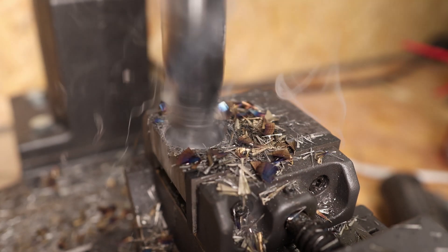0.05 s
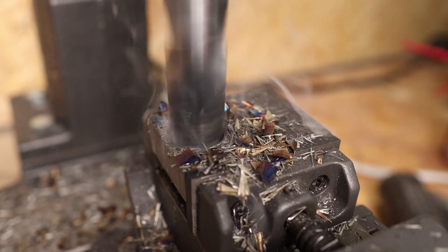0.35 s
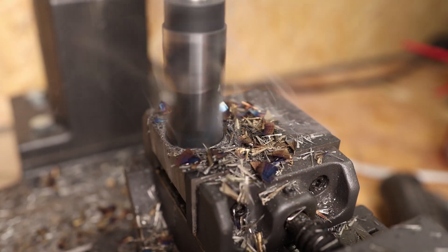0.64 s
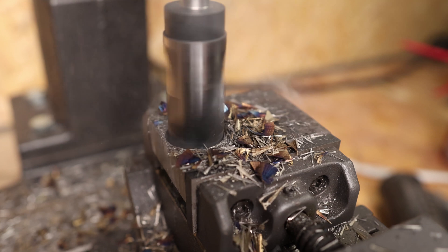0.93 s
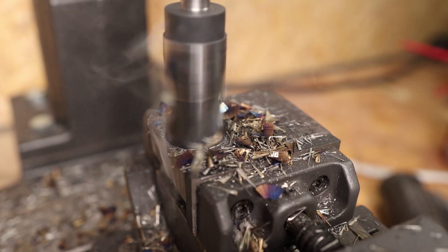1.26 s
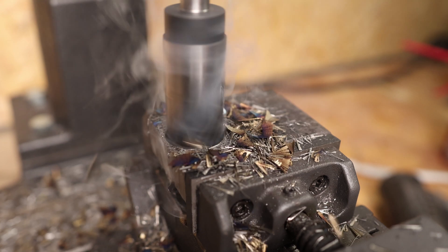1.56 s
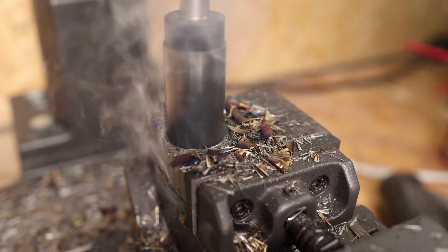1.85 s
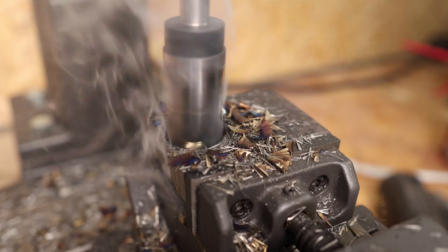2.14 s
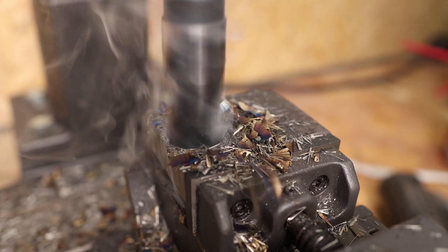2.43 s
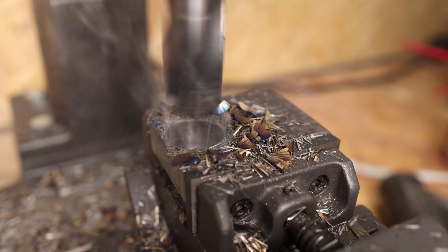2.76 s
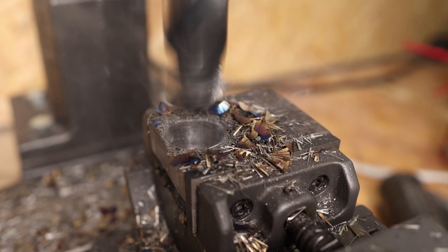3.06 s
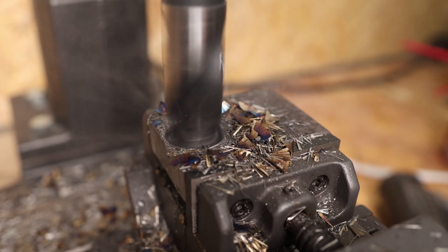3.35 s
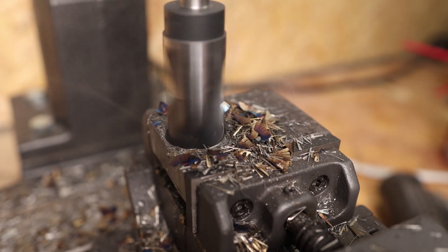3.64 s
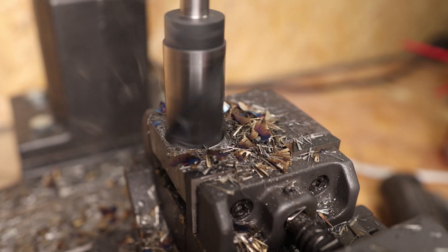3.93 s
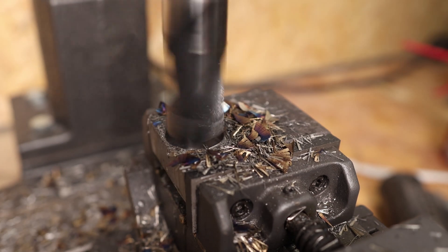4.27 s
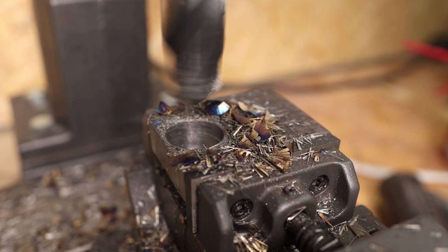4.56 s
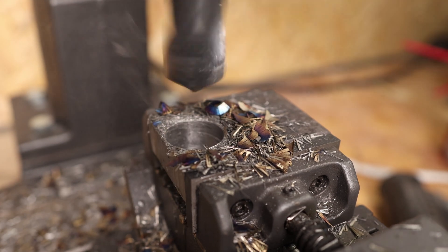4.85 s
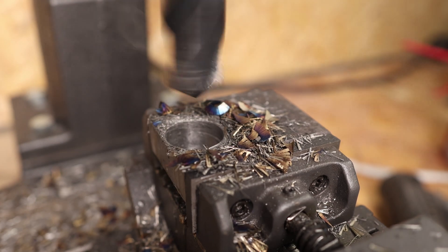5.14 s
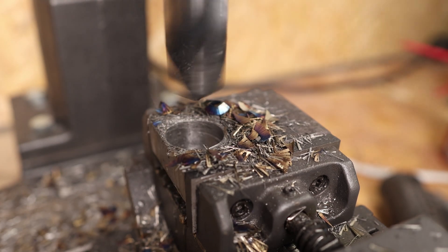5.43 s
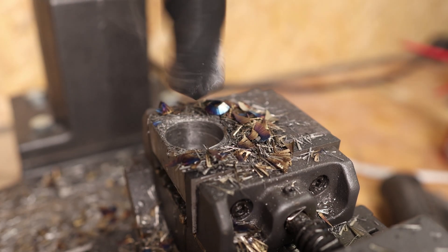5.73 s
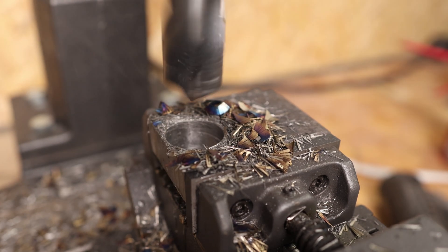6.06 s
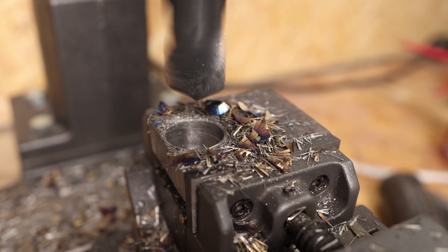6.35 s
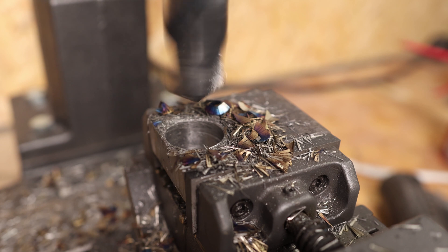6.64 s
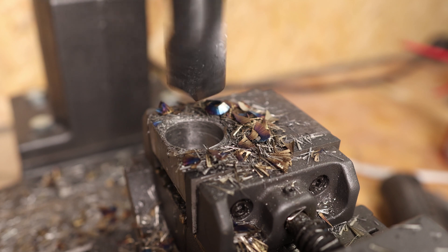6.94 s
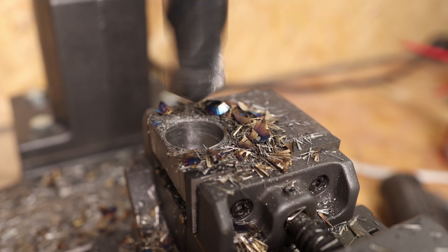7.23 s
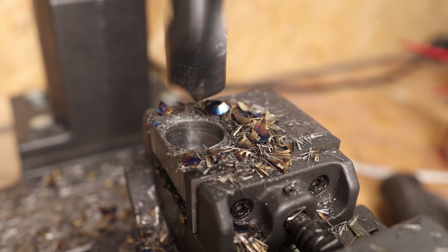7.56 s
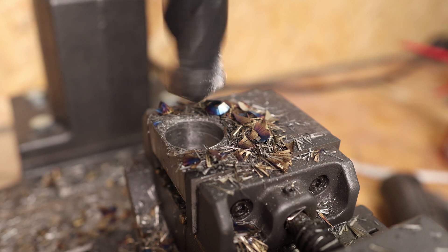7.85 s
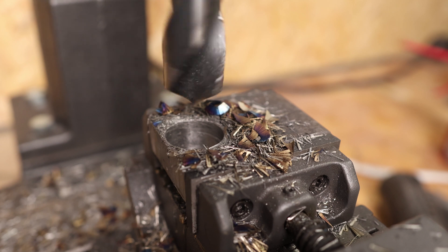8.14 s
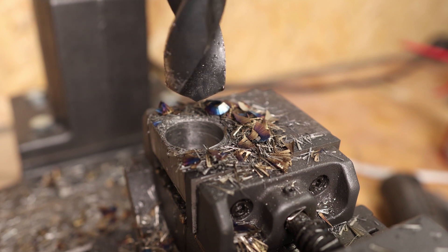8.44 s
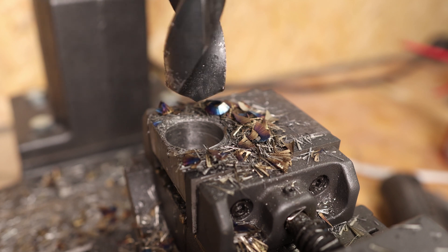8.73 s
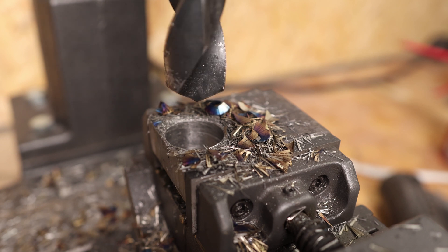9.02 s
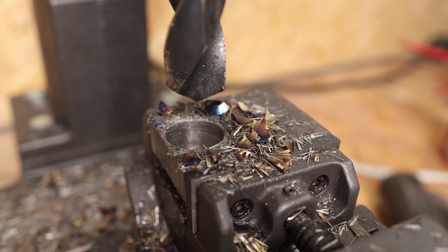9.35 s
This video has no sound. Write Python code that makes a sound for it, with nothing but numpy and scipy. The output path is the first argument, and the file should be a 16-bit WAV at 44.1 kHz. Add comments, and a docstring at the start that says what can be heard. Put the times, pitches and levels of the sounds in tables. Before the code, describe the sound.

Close up in a workshop, a belt-driven drill press hums, rattles and taps while its bit is pushed into steel three times. The second push is much the loudest, a slightly distorted grinding with groans, short squeals and tinkling metal chips. The drill then spins freely for a few seconds before it is clicked off and coasts to rest with several belt knocks, leaving a faint ring and a soft rustle.

```python
"""A belt-driven bench drill press runs: the motor hums, the pulleys rattle, a loose bearing taps.
A large bit is pushed into steel three times; it scrapes, squeals and snaps off chips that tinkle
on the vice. The second, hardest cut makes bit and table groan and overloads the close microphone.
After the third the bit is lifted with a faint hiss. The switch clicks, the belt knocks as the
motor coasts to a stop, the frame rings on, and something rustles softly, like a sleeve."""
import sys
import numpy as np
from scipy import signal
from scipy.fft import rfft, irfft, next_fast_len
from scipy.io import wavfile
from scipy.ndimage import map_coordinates

SR = 44100
rng = np.random.default_rng(int(sys.argv[2]) if len(sys.argv) > 2 else 0)


def wav_out(sig):
    """Save sig, one row per channel (or a flat mono array), as 16-bit PCM at SR to the path in sys.argv[1]."""
    wavfile.write(sys.argv[1], SR, np.round(np.clip(np.atleast_2d(sig).T, -1, 1) * 32767).astype(np.int16))


N = 422919
TIME = np.arange(N) / SR

FREE_HZ, SAG_HZ = 24.75, .55  # motor turns a second when free, and the drop under full load
OFF_S, COAST_S = 7.714, .82  # the power is cut; time to coast to rest

# broad tone of the rattling casting: f/Hz, level/dB
RATTLE = [(100, -29.5), (280, -2), (450, -4), (700, .5), (1100, 0.5), (1500, -0.4), (2300, -7),
          (2800, -16.5), (3500, -19.5), (4700, -17), (5400, -23), (7500, -29.5), (10000, -32.5),
          (12000, -39), (16000, -42)]
# resonances of the casting: f/Hz, width/Hz, boost/dB
CASTING_MODES = [(311.5, 43, 12), (360, 50, 7.8), (554.3, 57, 11.4), (855, 26, 3.6), (1417, 50, 5.6),
                 (1770, 57, 2.5), (2130, 61, 7.6), (2425, 56, 6.5), (4130, 330, 5), (4550, 40, 3.5),
                 (4760, 41, 5.3), (4870, 63, 6)]


def amp(db):
    """Decibels to gain."""
    return 10 ** (np.asarray(db) / 20)


def unit(x):
    """Scaled to rms 1."""
    return x / np.sqrt(np.mean(x ** 2) + 1e-20)


def along(points, hz):
    """(f/Hz, value) points read on a log frequency axis."""
    f, values = np.transpose(points)
    return np.interp(np.log(hz + 1), np.log(f + 1), values)


def curve(points, at=TIME):
    """(t/s, value) points joined by straight lines."""
    return np.interp(at, *np.transpose(points))


def wobble(rate):
    """A smooth random curve, rate knots a second."""
    knots = rng.standard_normal(int(N * rate / SR) + 4)
    return np.interp(TIME, TIME[::16], map_coordinates(knots, [TIME[::16] * rate]))


def noise():
    """Fresh white noise."""
    return rng.standard_normal(N)


def body(x, spectrum, modes=(), size=8192):
    """Colours x with a broad tone (f/Hz, level/dB) and resonances (f/Hz, width/Hz, boost/dB)."""
    hz = np.fft.rfftfreq(size, 1 / SR)
    peaks_db = sum(boost / (1 + (2 * (hz - f) / width) ** 2) for f, width, boost in modes)
    cepstrum = irfft(np.log(amp(along(spectrum, hz) + peaks_db)))
    cepstrum[1:size // 2] *= 2  # minimum phase: nothing rings ahead of a hit
    cepstrum[size // 2 + 1:] = 0
    return signal.oaconvolve(x, irfft(np.exp(rfft(cepstrum))))[:N]


def bursts(rows, attack, t60):
    """The envelope of blows (t/s, level/dB) that rise quickly and die away."""
    out, t = np.zeros(N + SR), np.arange(SR) / SR
    shape = (1 - np.exp(-t / attack)) * amp(-60 * t / t60)
    for s, db in rows:
        out[max(0, round(s * SR)):][:SR] += (amp(db) * shape) ** 2
    return np.sqrt(out[:N])


def swells(rows):
    """The envelope of smooth swells (t/s, level/dB, width/s)."""
    slow = TIME[::32]
    level = sum(amp(db) * np.exp(-((slow - s) / width) ** 2) for s, db, width in rows)
    return np.interp(TIME, slow, level)


def lagging(x, t60):
    """A control that follows x with inertia."""
    keep = amp(-60 / (t60 * SR))
    return signal.lfilter([1 - keep], [1, -keep], x - x[0]) + x[0]


def coasting():
    """Seconds since the power was cut."""
    return np.maximum(TIME - OFF_S, 0)


def motor_speed(feed_db):
    """Turns a second: the motor sags with the feed and coasts to rest once switched off."""
    load = lagging(amp(feed_db - feed_db.max()), t60=.4)
    run_down = 1 - np.clip(coasting() / COAST_S, 0, 1) ** 1.5
    return (FREE_HZ - SAG_HZ * load / load.max()) * run_down


def each_turn(turns, fresh, size=1600):
    """Surface roughness met again on every turn, with a fresh share that is new each time."""
    track = map_coordinates(rng.standard_normal(size), [turns % 1 * size], mode="grid-wrap")
    pace = np.abs(np.gradient(turns))  # a slower shaft meets the same bumps more gently
    return np.sqrt((1 - fresh) * pace / pace.max()) * unit(track) + np.sqrt(fresh) * noise()


def throb(turns, once, twice, fourfold):
    """The load on the shaft swells once, twice and four times a turn."""
    angle = 2 * np.pi * turns
    return unit(np.exp(once * np.cos(angle) + twice * np.cos(2 * angle) + fourfold * np.cos(4 * angle)))


def contacts(turns, pattern, scatter_db):
    """Hits (t/s, level/dB) that recur on every powered turn, never quite alike."""
    whole = np.arange(1, int(OFF_S * FREE_HZ) + 1)
    rows = np.array([(s, db) for share, db in pattern for s in np.interp(whole + share, turns, TIME)])
    return rows + np.clip(rng.standard_normal(rows.shape), -2, 2) * [.0004, scatter_db]


def workshop(x):
    """The room's reverb: each frequency dies at its own speed."""
    # decay of the room: f/Hz, t60/s
    decay = [(150, 0.17), (1000, 0.62), (5000, .28), (15000, 0.18)]
    hz, t, spectra = signal.stft(rng.standard_normal(SR // 2), SR, nperseg=256)
    tail = signal.istft(spectra * amp(-60 * t / along(decay, hz)[:, None]), SR, nperseg=256)[1]
    return signal.oaconvolve(x, tail / np.linalg.norm(tail))[:N]


def reflections(x):
    """The side signal: bench and column scatter the sound differently to left and right."""
    # stereo width: f/Hz, level/dB
    side_tone = [(30, -13), (120, -46), (350, -21.5), (700, -18), (1400, -14), (2800, -5.5), (6000, -6),
                 (14000, 1.5)]
    scatter = rng.standard_normal(SR // 25) * np.linspace(1, 0, SR // 25)
    return body(.76 * signal.oaconvolve(x, scatter / np.linalg.norm(scatter))[:N], side_tone)


def background():
    """Still air and a faint mains hum; at the end a soft rustle, as of a sleeve."""
    # room tone: f/Hz, level/dB
    air_tone = [(25, -2), (100, 2), (300, -1.5), (1500, -9), (5000, -10), (11000, -19), (16000, -35.5)]
    # tone of the cloth: f/Hz, level/dB
    cloth_tone = [(40, -16), (100, -4), (200, -12), (320, 5), (430, -1.5), (2000, -2.5), (5000, -6.5),
                  (9000, -14), (16000, -24)]
    # its movements: t/s, level/dB, width/s
    rustles = [(8.6, -74.5, 0.32), (8.85, -67.5, .05), (9.01, -63, 0.084), (9.22, -77.5, 0.151)]
    rustle = swells(rustles) * amp(1.2 * wobble(43)) * unit(body(noise(), cloth_tone))
    air = amp(-81) * unit(body(noise(), air_tone))
    mains = amp(-75) * np.sin(2 * np.pi * 100 * TIME)
    return rustle + air + mains


def switch_off():
    """The switch snaps and the frame rings on."""
    # press and release: t/s, level/dB
    clicks = [(7.714, -32.5), (8.24, -58)]
    # tone of the switch: f/Hz, level/dB
    click_tone = [(150, -11), (400, 4), (1500, 9), (5000, 0), (9000, -3), (16000, -12.5)]
    # lingering modes of the frame: f/Hz, level/dB, t60/s
    frame_rings = [(93, -51.5, 1.96), (162, -48.5, 1.52), (550, -61.5, 2.64), (930, -60, 1.54)]
    click = bursts(clicks, attack=.001, t60=.36) * unit(body(noise(), click_tone))
    rise = np.clip((TIME - 7.75) / .22, 0, 1)
    fading_s = np.maximum(TIME - 8.14, 0)
    ring = sum(amp(db - 60 * fading_s / t60) * np.sin(2 * np.pi * hz * TIME)
               for hz, db, t60 in frame_rings)
    return click + rise * ring


def belt_knocks():
    """As it slows, the slack belt knocks the casting and rings the steel pulleys."""
    # blows of the belt: t/s, level/dB
    knocks = [(7.8306, -31.5), (7.881, -27.5), (7.935, -29), (8.0634, -45.5), (8.111, -40.5), (8.1424, -33),
              (8.2424, -34.5)]
    # resonances of the pulleys: f/Hz, width/Hz, boost/dB
    pulley_modes = [(3990, 150, 15), (4330, 180, 13), (4730, 250, 9)]
    pulley_tone = [(1000, -32), (3000, -5), (4600, 1), (5600, -10), (9000, -28), (16000, -39)]
    thud = amp(-5.5) * bursts(knocks, attack=.001, t60=.11) * unit(body(noise(), RATTLE, CASTING_MODES))
    ring = unit(body(noise(), pulley_tone, pulley_modes))
    ring_hits = [(s, -45.5 + .37 * db) for s, db in knocks]  # the ring varies less than the thud
    return thud + bursts(ring_hits, attack=.001, t60=.15) * ring


def belt_guard(speed):
    """The belt guard booms at its own pitch when the load lets go and as the drive slows."""
    # booms as the load lets go: t/s, level/dB, width/s
    booms = [(1.94, -27.5, 0.12), (2.47, -27.5, .08), (3.96, -28.5, 0.11)]
    slowing = np.clip(coasting() / .27, 0, 1) ** 2 * speed / speed.max()
    level = (swells(booms) + amp(-33) * lagging(slowing, t60=.22)) * amp(.95 * wobble(22))
    hz = 234 + 3 * wobble(23)
    return level * np.sin(2 * np.pi * np.cumsum(hz) / SR)


def motor(speed, turns):
    """Unbalance and magnetic pull hum at multiples of the speed and die soon after the power is cut."""
    # motor hum: multiple of the speed, level/dB
    hum = [(1, -50), (2, -41), (3, -29.5), (4, -1), (5, -9.5), (6, -13.5), (7, 1), (8, -9), (9, -1),
           (10, -20), (11, -26.5), (12, -8), (13, -14.5), (14, -9), (15, -14.5), (16, -9.5)]
    # thin whine of fan and ball races: multiple of the speed, level/dB
    whine = [(22, -21), (31, -24.5), (34, -17), (35, -17), (45, -19.5), (58, -15.5), (63, -21.5), (68, -19),
             (69, -21.5), (86, -19), (94, -17), (96, -22), (98, -21.5), (106, -30.5), (119, -33),
             (153, -35.5), (173, -33), (184, -30.5), (190, -27.5), (198, -29)]
    share = np.linspace(0, 1, 8193)
    one_turn = sum(amp(db) * np.sin(2 * np.pi * (k * share + rng.random())) for k, db in [*hum, *whine])
    dying = amp(-50 * coasting()) * (speed / speed.max()) ** 3
    return amp(-39 + .53 * wobble(6.7)) * dying * np.interp(turns % 1, share, one_turn)


def bearing(turns, catch_db):
    """A loose, dry bearing taps and rasps on every turn, and its housing sings."""
    # the taps of one turn: position/turns, level/dB
    tap_pattern = [(0, -0.5), (.14, -4.5), (.34, -8.5), (.6, -5.5)]
    # the hardest taps, on the same scale: t/s, level/dB
    accents = [(3.0949, 5.5), (3.2575, 5.5), (5.238, 3), (5.8865, 3), (5.9673, 3.5), (6.0881, 5),
               (6.2497, 1.5), (6.331, 7), (7.0579, 3)]
    # loudness of the whole bearing: t/s, level/dB
    loudness = [(0, -39), (2.7, -38.5), (3.5, -38), (4.6, -40), (5, -35.5), (5.45, -40), (5.8, -38),
                (7.6, -38)]
    housing_hz = 1235
    housing_tone = [(500, -37.5), (1050, -10.5), (1215, 5.5), (1340, -10.5), (1600, -22),
                    (2500, -42.5), (6000, -80)]
    hits, taps = contacts(turns, tap_pattern, scatter_db=1.3), np.zeros(N)
    for s, db in accents:
        hits[np.argmin(np.abs(hits[:, 0] - s))] = s, db
    taps[np.round(hits[:, 0] * SR).astype(int)] = amp(hits[:, 1])
    rasp = each_turn(turns, fresh=.9) * amp(catch_db)
    ring = body(unit(taps) + amp(-2) * unit(rasp), housing_tone, [(housing_hz, 46, 9.9)])
    sing_level = amp(-2.5 + .6 * wobble(25) + .7 * catch_db)
    singing = sing_level * np.sin(2 * np.pi * housing_hz * TIME + .88 * wobble(24))
    return amp(curve(loudness)) * unit(singing + unit(ring))


def drive(speed, turns):
    """Pulleys rattle the casting and shake the frame, while the bearing taps."""
    # rumble of the frame: f/Hz, level/dB
    rumble_tone = [(25, -37), (70, -25.5), (110, -12.5), (140, -4), (230, -5.5), (265, -16.5), (340, -5),
                   (450, -24), (1000, -54.5), (4000, -100)]
    # resonances of the frame: f/Hz, width/Hz, boost/dB
    frame_modes = [(139, 15, 10), (168, 14, 3.1), (226.2, 37, 11)]
    rattle_fade_db_per_s, bearing_fade_db_per_s = 32, 52  # once the power is cut
    coast_s, pace = coasting(), speed / speed.max()
    flap_db = .5 * wobble(22)  # the belt flaps unevenly
    # the bearing catches once a turn, never equally hard, and eases through the turn
    turn_db = 1.05 * rng.standard_normal(int(TIME[-1] * FREE_HZ))
    catch_db = turn_db[turns.astype(int)] - 6.5 * (turns % 1)
    bumps = each_turn(turns, fresh=.78) * throb(turns, once=.05, twice=.1, fourfold=.091)
    rattle = unit(body(bumps * amp(.6 * wobble(110) + .4 * catch_db), RATTLE, CASTING_MODES))
    rattle *= amp(-38.5 - rattle_fade_db_per_s * coast_s + flap_db)
    shaking = each_turn(turns, fresh=.8) * throb(turns, once=.13, twice=.14, fourfold=.088)
    rumble = unit(body(shaking, rumble_tone, frame_modes))
    shudder_db = 6 * (coast_s > 0)  # the slowing drive shakes the frame harder
    rumble *= lagging(amp(-40.5 + shudder_db) * pace ** 2, t60=.42)
    tapping = amp(-bearing_fade_db_per_s * coast_s) * bearing(turns, catch_db)
    return np.sqrt(pace) * (rattle + tapping) + rumble


def chips(turns):
    """Loose chips hop on the vice in time with the motor; each rings briefly, to the left or right."""
    # the jolts of one turn: position/turns, level/dB
    hop_pattern = [(-.02, 1), (.16, -2.5), (.42, -5), (.56, -2)]
    # how hard the chips are shaken: t/s, level/dB
    shake = [(0, -58), (.4, -61), (.6, -55), (.85, -56.5), (1, -38), (1.82, -36), (2.05, -50), (2.25, -63),
             (2.35, -52), (2.42, -32), (2.5, -53), (2.75, -62), (3.35, -57), (3.55, -49.5), (3.72, -52),
             (3.86, -40), (4.05, -50.5), (4.3, -46.5), (4.42, -60.5), (7.7, -63)]
    # stand-out tinkles, each of which bounces once: t/s, level/dB, f/Hz
    tinks = [(.107, -43, 10200), (0.2793, -41, 10250), (0.488, -34, 10290), (3.185, -46, 10350),
             (3.2843, -45, 10300), (3.4987, -35.5, 10300), (3.6775, -33, 10500), (3.8514, -24, 10400),
             (4.1536, -35, 10600), (4.5181, -37.5, 10300), (4.8903, -41, 10300), (5.1986, -40, 10280),
             (5.3572, -42.5, 5600), (5.69, -43, 10350), (5.9399, -41, 5630), (6.0452, -42, 10300),
             (6.1679, -38, 10200), (6.752, -44.5, 10400), (6.8548, -45, 10400), (6.991, -47, 10350),
             (7.1202, -39, 10250), (7.5811, -43.5, 10350)]
    small_hz, big_hz, big_share, t60 = 10280, 5700, .19, .014
    when, hop_db = contacts(turns, hop_pattern, scatter_db=7.5).T
    pick, detune = rng.random((2, len(when)))
    pitch = np.where(pick < big_share, big_hz, small_hz) * (1 + .025 * (detune - .5))
    hops = np.column_stack([when, hop_db + curve(shake, when), pitch])
    bounces = [(s + .008, db - 9, hz) for s, db, hz in tinks]
    hits = np.vstack([tinks, bounces, hops])
    out, t = np.zeros((2, N + SR)), np.arange(SR // 40) / SR
    shape = amp(-60 * t / t60) * (1 - np.exp(-t / .0005))
    skids = .15 * np.cumsum(rng.standard_normal((len(hits), len(t))), axis=1)  # roughens the ring
    for (s, db, hz), skid, place in zip(hits, skids, rng.uniform(-1, 1, len(hits))):
        ring = np.sin(2 * np.pi * hz * t + skid + [[place], [-place]])  # panned by phase
        out[:, round(s * SR):][:, :len(t)] += amp(db) * shape / shape.max() * ring
    return out[:, :N]


def quill():
    """The greased quill slides back up with a faint hiss."""
    # its slides: t/s, level/dB, width/s
    slides = [(6.55, -55.5, .06), (7.2, -52.5, .08)]
    hiss = body(noise(), [(1000, -10.5), (5000, 4), (9000, -11), (16000, -15.5)])
    return swells(slides) * unit(hiss)


def flute_rubs():
    """The flutes rasp on the wall of the hole once a spindle turn and ring two high modes of the bit."""
    # spells of rubbing: first t/s, last t/s, level/dB
    spells = [(.03, .03, -37.5), (.51, .627, -42.5), (.742, .86, -40.5), (2.37, 2.6, -40.5),
              (3.45, 4.27, -40.5)]
    turn_s, width_s = .1171, .031
    rub_tone = [(500, -30.5), (1400, 9), (2700, 0), (3400, -16), (5500, -18.5), (9000, -24.5),
                (16000, -33.5)]
    grit = noise() * amp(3.5 * np.tanh(wobble(300)) + 3 * np.tanh(wobble(70)))
    ring = body(grit, rub_tone, [(4400, 500, 23), (10950, 170, 26)])
    rubs = [(s, db + rng.normal(0, 1), width_s)
            for first, last, db in spells for s in np.arange(first, last + turn_s / 2, turn_s)]
    return amp(3.5) * swells(rubs) * unit(ring)


def bit_squeaks():
    """The bit sticks and slips in the hole, locking briefly and roughly onto a pitch."""
    # squeaks: t/s, f/Hz, level/dB, octave against fundamental/dB, length/s
    squeaks = [(2.004, 2074, -23, -3.5, 0.024), (2.016, 2060, -32, -1, 0.055),
               (2.101, 1753, -27, -2, 0.025), (2.12, 1785, -20.5, -23, 0.027),
               (4.254, 4400, -41, -20, 0.039)]
    out = np.zeros(N)
    jitter, rough = .78 * wobble(500), amp(2 * wobble(470))
    for s, hz, db, octave_db, length in squeaks:
        swell = np.sin(np.pi * np.clip((TIME - s) / length, 0, 1))
        angle = 2 * np.pi * hz * TIME + jitter
        out += amp(db) * swell * (np.sin(angle) + amp(octave_db) * np.sin(2 * angle))
    return out * rough


def chip_squeals():
    """The curling chip drags on the flute in short, rough squeals, each at its own pitch."""
    # squeals: t/s, length/s, f/Hz, width/Hz, level/dB
    squeals = [(0.72, 0.038, 4600, 600, -39), (0.737, 0.027, 2750, 500, -39), (.95, .03, 4650, 500, -26),
               (1.07, 0.049, 1900, 250, -16.5), (1.13, 0.032, 4450, 701, -21.5),
               (1.175, .035, 4900, 700, -24), (1.234, 0.044, 4500, 500, -25.5),
               (1.36, 0.046, 4550, 550, -21.5), (1.452, .04, 5050, 551, -25), (1.495, .022, 4300, 300, -24),
               (1.645, 0.044, 4100, 160, -27.5), (1.71, 0.025, 4100, 300, -23.5),
               (1.712, 0.021, 5800, 2600, -25)]
    out = np.zeros(N)
    for s, length, hz, width, db in squeals:
        band = signal.butter(2, [hz - width / 2, hz + width / 2], "bandpass", fs=SR, output="sos")
        drag = signal.sosfilt(band, rng.standard_normal(SR // 8))[-round(length * SR):]
        swell = np.sin(np.linspace(0, np.pi, len(drag)))
        out[round(s * SR):][:len(drag)] += amp(db) * swell * unit(drag)
    return out


def chatter():
    """Under heavy feed the bit digs in and springs back in short groans, each sagging in pitch."""
    # groans of bit or table: t/s, length/s, starting f/Hz, level/dB
    groans = [(.9, 0.084, 330, -18), (.975, 0.08, 205.7, -17), (1.01, 0.062, 325, -23),
              (1.08, 0.15, 213.6, -17), (1.2, 0.17, 204.5, -17), (1.29, 0.088, 316, -15.5),
              (1.365, 0.086, 195.5, -15), (1.435, 0.068, 327, -19), (1.49, .1, 187.5, -21),
              (1.565, 0.079, 324.6, -16.5), (1.635, .11, 174.8, -18), (1.73, 0.13, 158.5, -26),
              (1.88, 0.064, 338, -23)]
    sag_per_s = 1.1  # as a share of the starting pitch
    out = np.zeros(N)
    waver, rough = 1 + .022 * wobble(70), amp(1.2 * wobble(60))
    for s, length, hz, db in groans:
        span = slice(round(s * SR), round((s + length) * SR))
        t = TIME[span] - TIME[span][0]
        angle = 2 * np.pi * np.cumsum(hz * (1 - sag_per_s * t) * waver[span]) / SR
        tone = np.sin(angle) + .16 * np.sin(2 * angle) + .17 * np.sin(3 * angle)
        out[span] += amp(db) * np.sin(np.pi * t / length) * tone
    return out * rough


def cutting(feed_db, turns):
    """The lips shear the steel in uneven slips that ring the bit; the table groans and chips snap."""
    # tone of scraped steel: f/Hz, level/dB
    scrape_tone = [(100, -30.5), (300, -4), (700, -5), (1150, 1.5), (1450, 4), (2100, 3.5), (2800, -3.5),
                   (3600, -11), (5200, -13), (7000, -26.5), (9500, -34), (12000, -33.5), (16000, -36.5)]
    # resonances of the bit: f/Hz, width/Hz, boost/dB
    bit_modes = [(1416, 43, 7.5), (1520, 25, 3.3), (1620, 50, 2.5), (1910, 23, 4.8), (2050, 25, 6),
                 (2490, 30, 3.6), (2750, 39, 6.1), (4310, 200, 6.6), (7260, 400, 3.3), (10430, 840, 15)]
    # tone of the loaded table: f/Hz, level/dB
    groan_tone = [(30, -42), (100, -29), (140, -12), (210, 1), (260, -15), (340, -4), (450, -13.5),
                  (620, -10), (1000, -17), (2000, -41), (6000, -81.5)]
    # resonances of the table: f/Hz, width/Hz, boost/dB
    table_modes = [(183, 20, 1.8), (304, 23, 4.5), (530, 35, 4.1), (597, 54, 7)]
    # the edge grabs and a chip breaks: t/s, level/dB
    grabs = [(0.0184, -19.5), (0.4878, -27), (0.884, -2.5), (1.0216, -10.5), (1.072, -10.5), (1.142, -9),
             (1.46, -12), (1.713, -10.5), (1.785, -9), (1.908, -16.5), (2.0118, -7.5), (2.396, -10.5),
             (2.4194, -11), (3.829, -9.5), (3.9135, -13), (3.944, -12), (4.0143, -24.5), (4.0661, -24),
             (4.1205, -19.5)]
    fizz_tone = [(1500, -7), (3000, 2), (4700, -3), (7000, -7), (10000, -10.5), (16000, -22)]
    snap_tone = [(150, -15.5), (600, -1), (1500, 6.5), (4500, -10), (9000, -19), (16000, -26.5)]
    bite_db = feed_db + .6 * wobble(30)
    slips = noise() * amp(5 * np.tanh(.6 * wobble(350) + .5 * wobble(75)))
    scrape = amp(bite_db) * unit(body(slips, scrape_tone, bit_modes))
    # a deep bite tears the chip, so its fizz grows faster than the feed
    fizz = amp(1.7 * bite_db + 5.5) * unit(body(slips, fizz_tone, [(4660, 700, 4.7)]))
    judder = each_turn(turns, fresh=1) * amp(1.7 * wobble(60))
    groan = amp(bite_db - 2) * unit(body(judder, groan_tone, table_modes))
    crack = unit(body(noise(), snap_tone, [(1370, 130, 8.3), (7400, 590, 5)]))
    snaps = amp(-7) * bursts(grabs, attack=.002, t60=.11) * crack
    return scrape + fizz + groan + snaps


def scene():
    """The machine stands straight ahead; the feed drives the cut and loads the motor."""
    # feed pressure on the bit through the three pushes: t/s, level/dB
    feed = [(0, -36.5), (.08, -42.5), (.18, -52), (.45, -62), (.5, -42), (.862, -39), (.893, -16),
            (1.16, -14), (1.35, -16.5), (1.55, -17), (1.63, -20), (1.7, -17.5), (1.77, -26), (1.8, -19),
            (1.88, -26), (1.96, -34), (2.1, -30), (2.34, -40), (2.43, -28), (2.51, -39), (2.61, -39.5),
            (2.68, -62.5), (3.38, -64.5), (3.48, -41.5), (3.77, -41), (3.84, -32.5), (3.97, -33),
            (4.07, -37), (4.28, -41), (4.6, -100)]
    feed_db = curve(feed)
    speed = motor_speed(feed_db)
    turns = np.cumsum(speed * (1 + .0012 * wobble(4))) / SR
    turns += (-np.interp(5.8865, TIME, turns)) % 1  # a turn begins on one of the hard taps
    near = (drive(speed, turns) + belt_guard(speed) + cutting(feed_db, turns) + flute_rubs() + quill()
            + bit_squeaks() + chip_squeals() + belt_knocks() + switch_off() + background())
    mid = near + amp(-11) * workshop(near) + motor(speed, turns) + chatter()
    side = reflections(near)
    return np.array([mid + side, mid - side]) * amp([[.15], [-.15]]) + chips(turns)


def record(dry):
    """The input stage overloads on the hard cut; the very top of the treble is cut away."""
    ceiling, hardness, top_hz = .28, 8, 15780
    clipped = dry / (1 + np.abs(dry / ceiling) ** hardness) ** (1 / hardness)
    size = next_fast_len(N + SR // 4)
    passband = np.fft.rfftfreq(size, 1 / SR) < top_hz
    return irfft(rfft(clipped, size) * passband, size)[:, :N]


dry = scene()
out = record(dry)
wav_out(out)
```